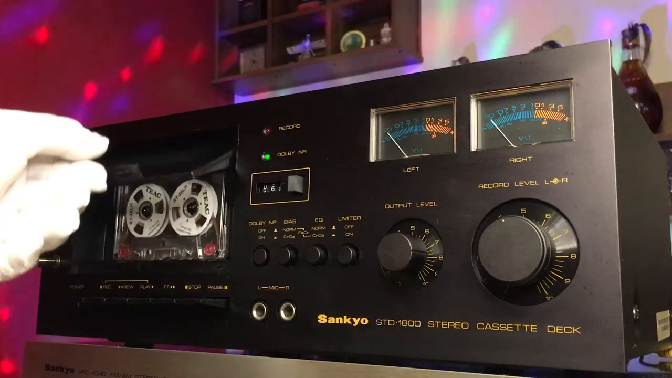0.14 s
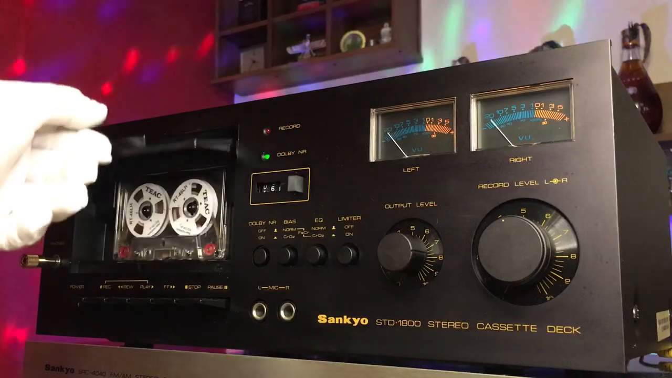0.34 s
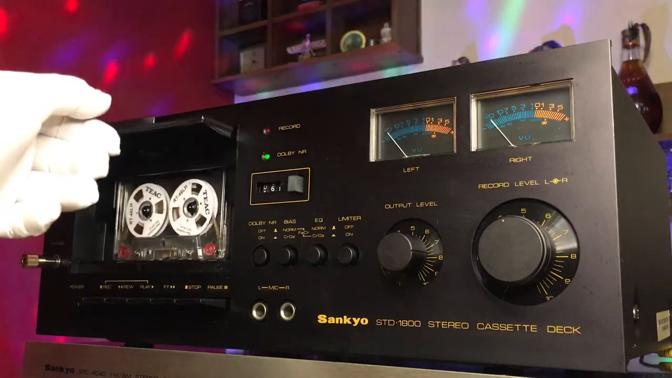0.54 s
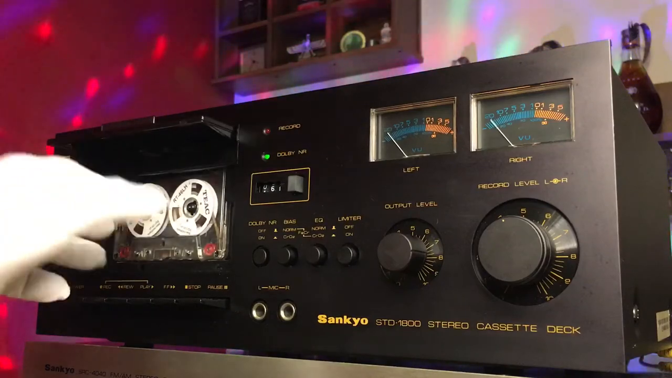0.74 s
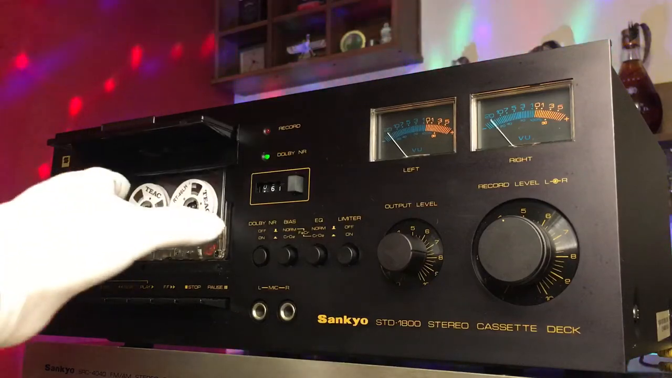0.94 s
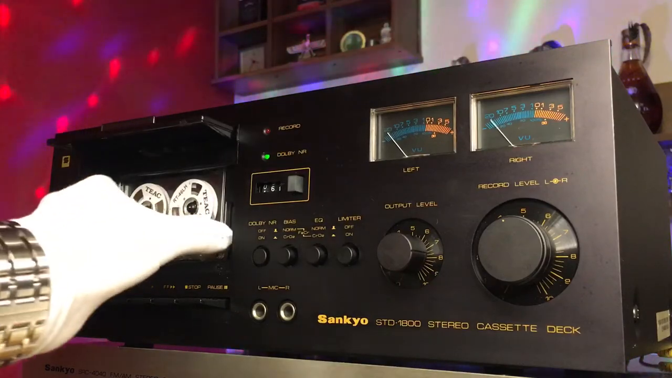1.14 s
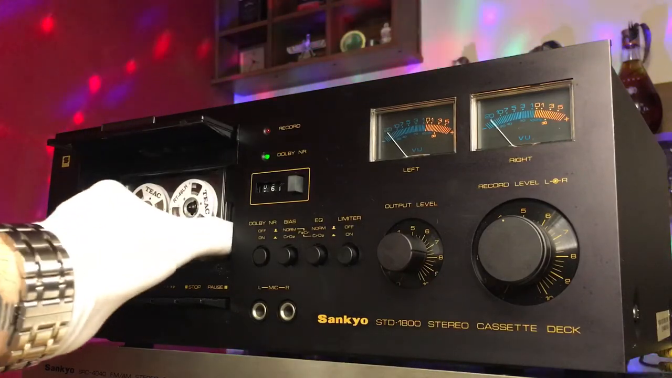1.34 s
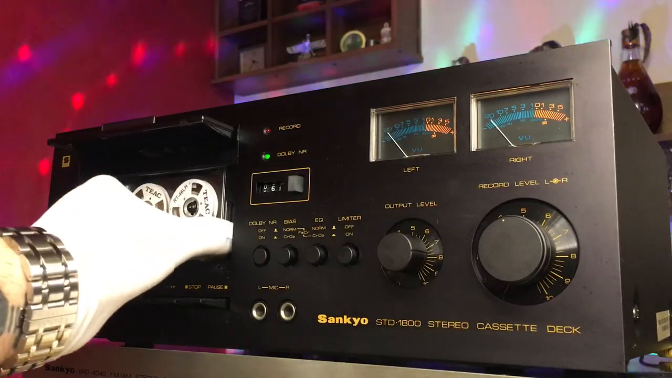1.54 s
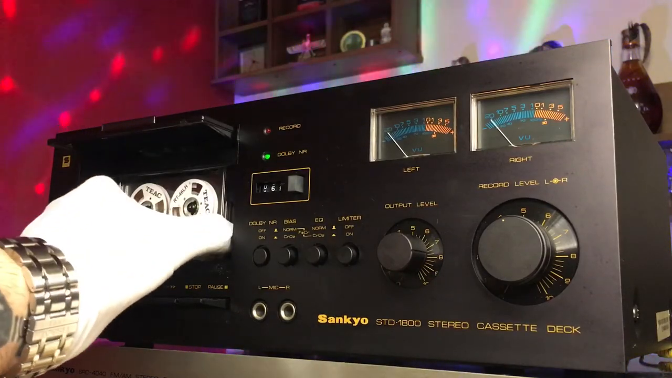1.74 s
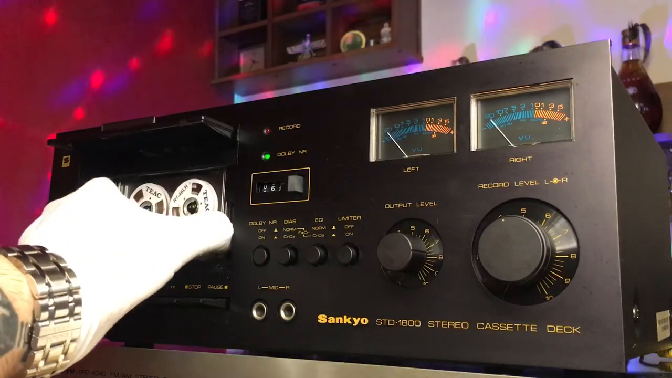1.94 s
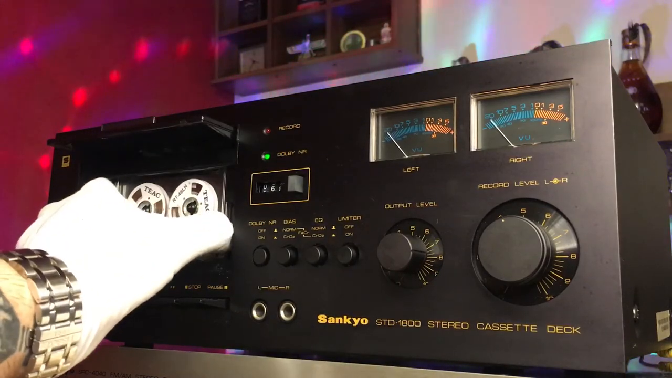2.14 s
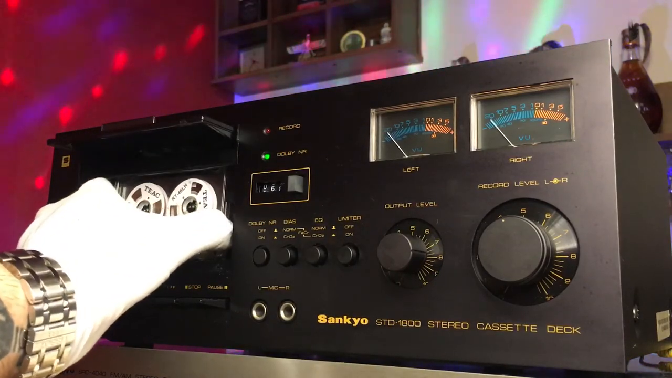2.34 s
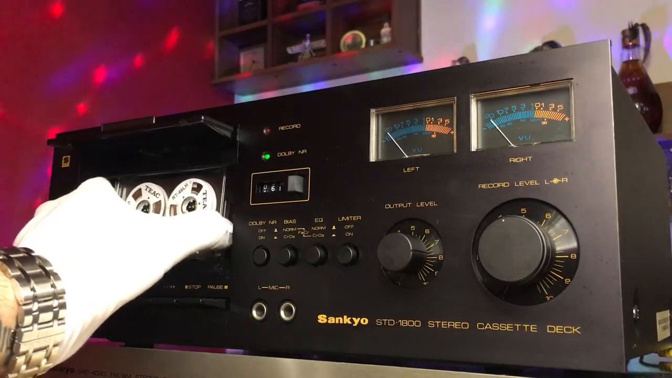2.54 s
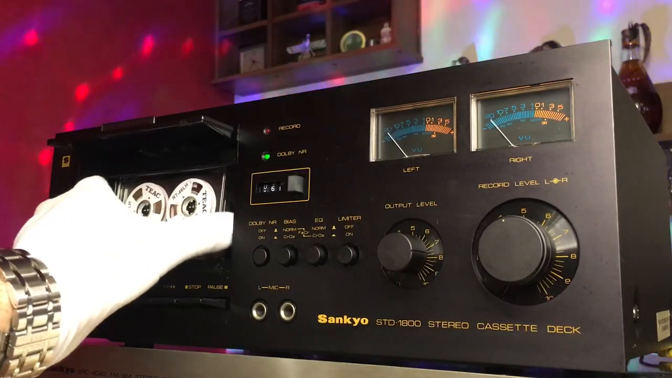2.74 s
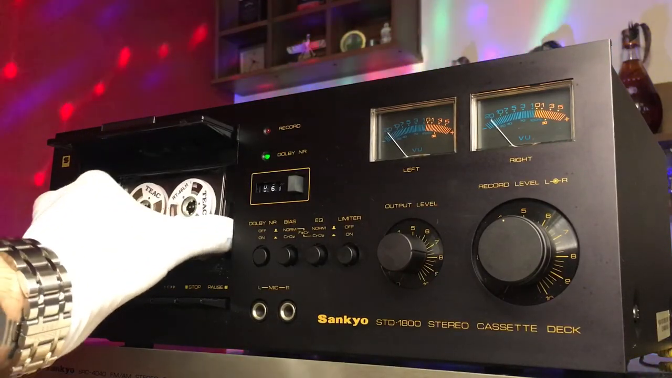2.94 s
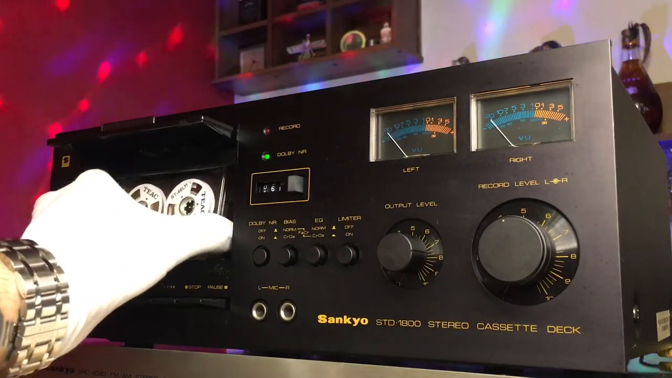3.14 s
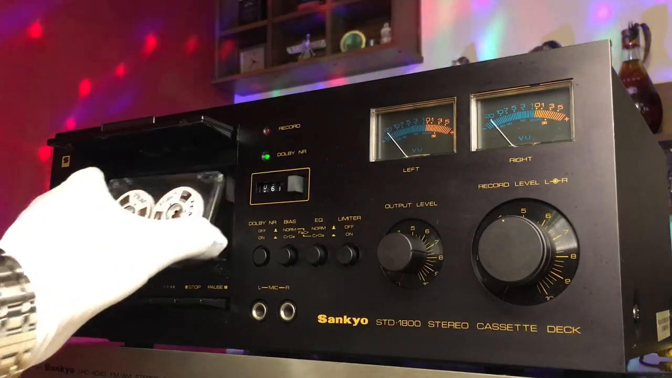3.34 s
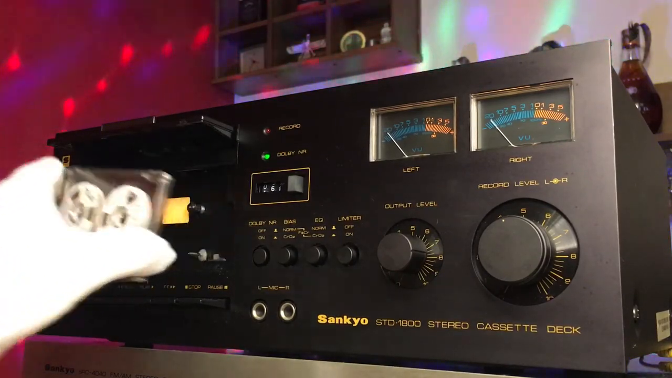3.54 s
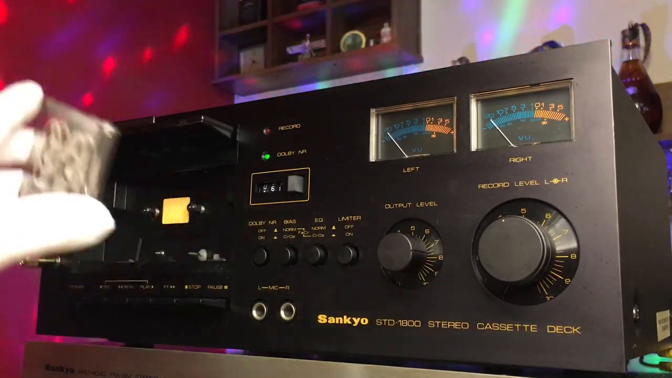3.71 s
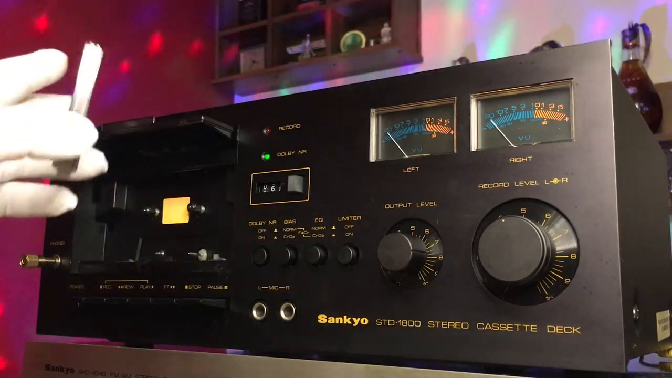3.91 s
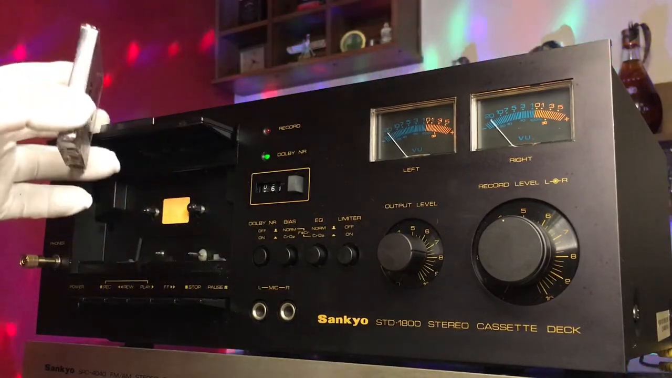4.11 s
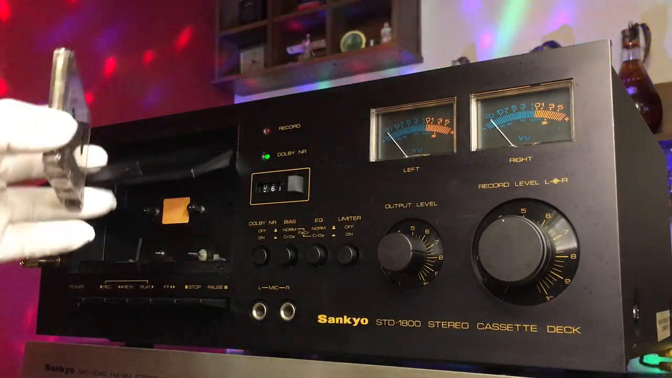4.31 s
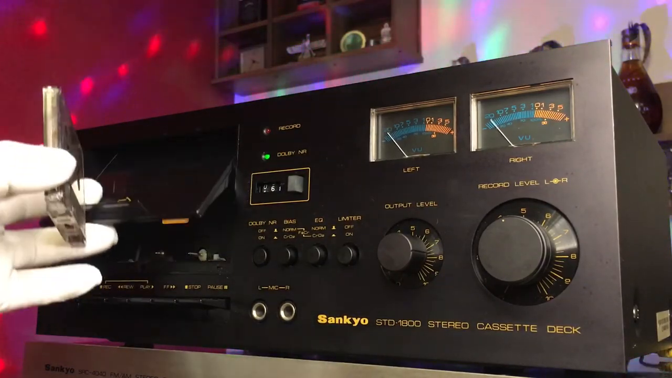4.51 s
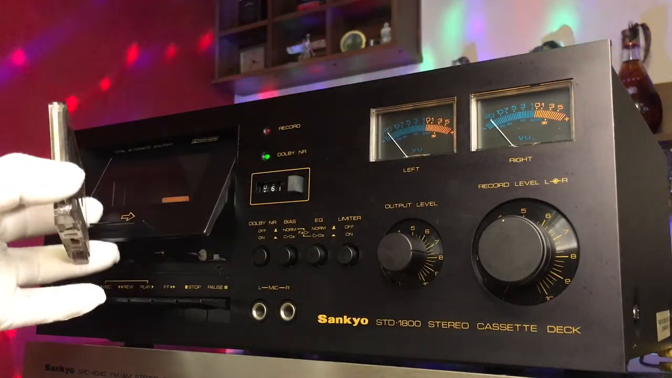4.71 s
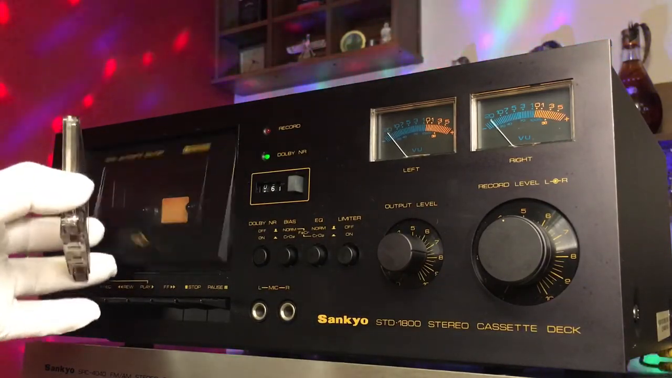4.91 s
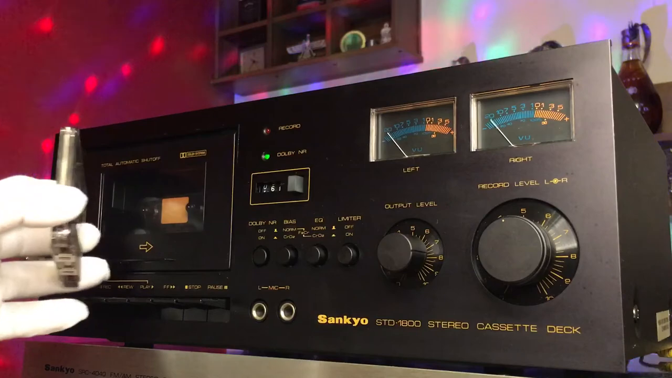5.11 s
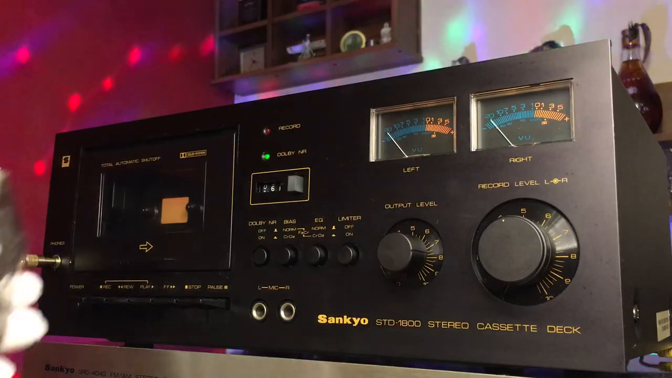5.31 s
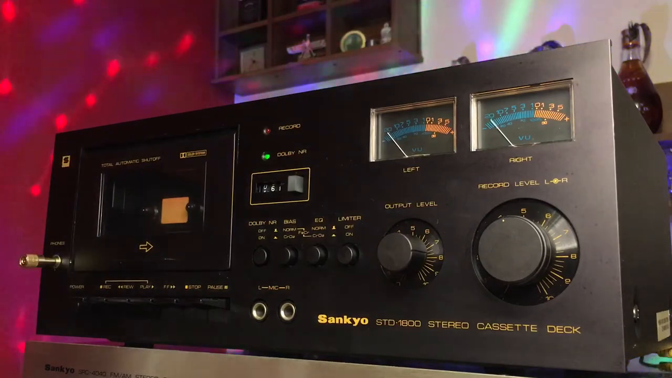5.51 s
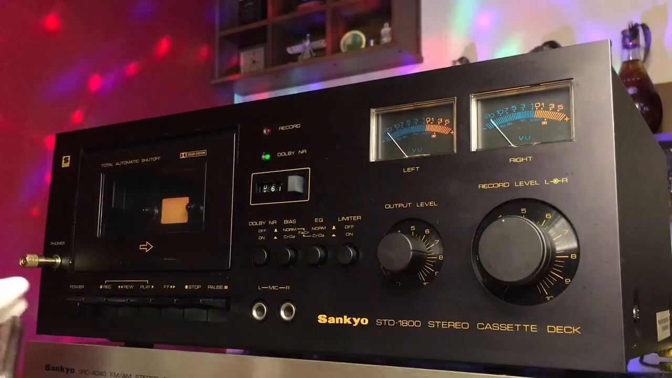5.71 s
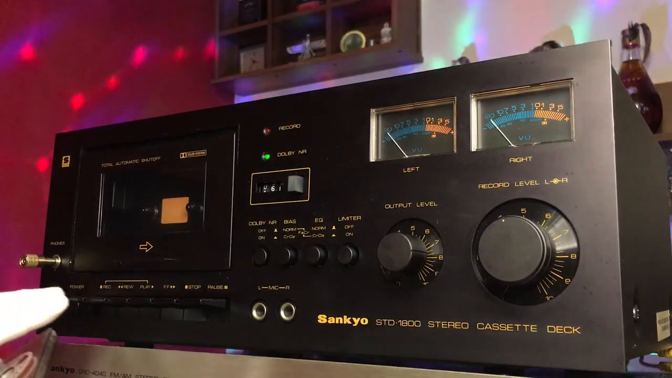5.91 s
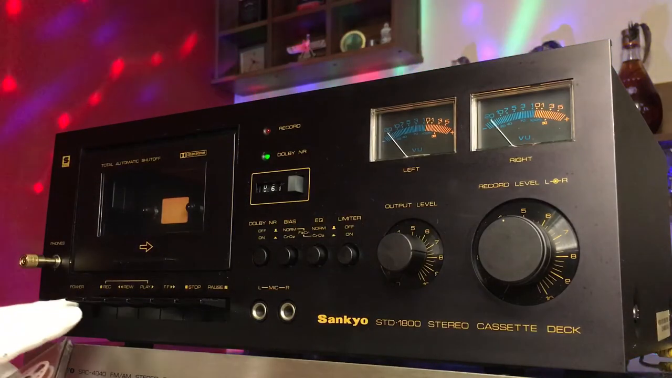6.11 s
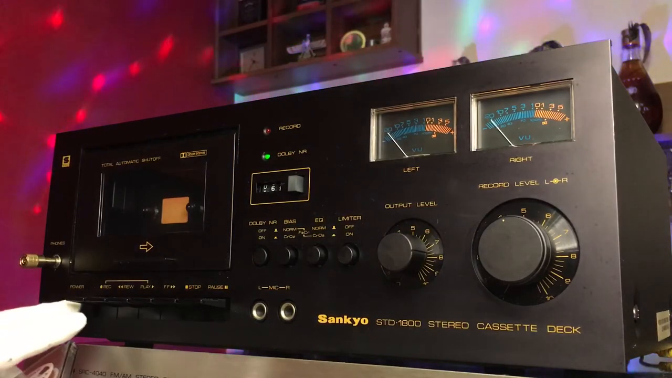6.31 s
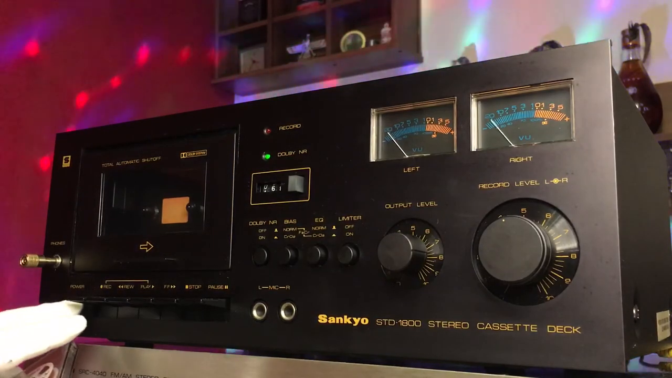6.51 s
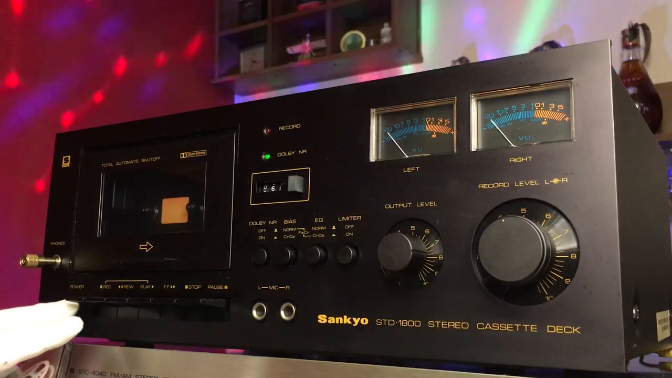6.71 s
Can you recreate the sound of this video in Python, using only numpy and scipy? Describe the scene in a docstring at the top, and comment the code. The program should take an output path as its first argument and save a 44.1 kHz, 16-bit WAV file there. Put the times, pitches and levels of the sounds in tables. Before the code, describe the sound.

Close view of a cassette deck in a small quiet room. The door flips up with a sharp bouncing clack, gloved fingers rub and tick faintly on plastic, the cassette comes free in a quick rattle, then the door slams shut with a louder, hollow snap. Faint clicks at a key follow, over low hum and soft room tone.

```python
"""Cassette deck door, handled in a small quiet room

A hand works the door of a cassette deck: the door flips up against its stop, fingers rock the cassette and
pull it off its spindles, the door snaps shut and bounces, a finger then presses a key. Noise bursts ring the
struck part, front panel and hollow case; sliding is grainy noise. Sine hum, room tone, far rumble below."""
import sys
import numpy as np
from scipy import signal
from scipy.fft import rfft, irfft
from scipy.io import wavfile

SR = 44100
rng = np.random.default_rng(int(sys.argv[2]) if len(sys.argv) > 2 else 0)


def output_pcm(signal):
    """Save a mono or channel-first signal as 16-bit PCM at the path in sys.argv[1].

    Samples are clipped to [-1, 1] before scaling.
    """
    pcm = np.clip(np.atleast_2d(signal).T, -1, 1) * 32767
    wavfile.write(sys.argv[1], SR, np.round(pcm).astype(np.int16))


N = 302526

# door meets a stop: t/s, level/dB, door f/Hz, contact length/ms, door ring t60/ms, edge crack/dB,
# broad knock/dB, push on case/dB, stop f/Hz, stop level/dB, time to first bounce/s
DOOR_BLOWS = [(0.449, -15.5, 1016, 5.15, 23, -6.5, -2, -12.5, 2804, -12.5, .0339),
              (5.0128, -8, 1372, 3.64, 19, -16, -1.4, -12, 855, -9.5, .0382)]
# bounces after each blow: delay/first-bounce times, level change/dB, push change/dB
BOUNCES = [(1.0, -9, -8.5), (1.25, -16.5, -4)]
# fingers, cassette, key: t/s, level/dB, part f/Hz, part ring t60/ms, edge crack/dB, broad knock/dB,
# push on case/dB
TOUCHES = [ (1.008, -49.5, 1110, 9.8, -28, -7, -21), (1.618, -47.5, 940, 73, -7, 6.5, -3.5),
           (1.958, -54.5, 1020, 18, -14, -2, -11), (2.086, -48, 1370, 9.4, -27, 6, -11),
           (2.242, -54.5, 1930, 8.4, 0, 5, -3), (2.253, -52.5, 2930, 9, -9, -1, -18),
           (2.262, -48, 1350, 17, -19, 4, -27), (2.312, -57, 3300, 10, -1, -4, -4),
           (2.487, -50.5, 1320, 9.1, -9, -10.5, -7), (2.612, -57, 1970, 8.1, 3.5, 0, -2),
           (2.734, -53, 2000, 12, -23, 7.5, -16), (2.771, -55, 1330, 15, -3, -2, -2),
           (2.791, -45, 587, 40, -22, -20, -18), (3.155, -37.5, 920, 10, -24, -5, -8),
           (3.167, -42.5, 2930, 7.6, -4, 4, -11), (3.173, -42, 1150, 14, -18, -11, -6),
           (3.192, -36.5, 1400, 15, -2.5, 0, -25), (3.205, -39, 1680, 17, -15, -4, -13),
           (3.232, -37.5, 3140, 9.8, -11, -6, -19), (3.239, -35, 3890, 14, -4, 3, -8),
           (3.246, -35, 1350, 14, 0.8, 7.5, -13.5), (3.249, -25.5, 1340, 22, -7.5, 4, -13.5),
           (3.292, -38, 1070, 37, -25, -5, -8), (3.303, -35.5, 1225, 37, -22, -3.5, -8.5),
           (3.342, -38.5, 1360, 12, -20, -1, -24), (3.363, -40, 1110, 11, -31, -17, -3),
           (3.817, -47.5, 5300, 7, 3, -5, -13.5), (4.043, -46, 985, 11, -32, -4.5, -10),
           (4.258, -38.5, 923, 32, -23, -3, -11.5), (4.319, -54, 970, 29, -25, -9, -19),
           (4.946, -51.5, 905, 38, -20, -3, -4), (6.207, -48, 1830, 7.3, -8, -12, -16),
           (6.505, -44, 1800, 33, -1.5, 2.7, -21), (6.761, -43, 1743, 30, -11, -18, -22.5),
           (6.767, -43, 1710, 39, -24, -6, -17), (6.786, -57, 650, 12, 5, 7, 7.5)]
# plastic on plastic, modes too many to count: f/Hz, spectral density/dB
KNOCK_SPECTRUM = [(150, -27), (400, -19), (700, -14), (1000, -11), (1500, 6), (2100, -5.5), (3300, -9.5),
                  (6000, -23.5), (10000, -37), (15500, -49.5)]
# front panel and door modes: f/Hz, level/dB, t60/s
PANEL_MODES = [(703, -15, 0.15), (832.4, -5, .1), (877, -7.5, 0.029), (1080, -16.5, 0.096),
               (1201, -1.5, 0.063), (1227, 0, 0.071), (1403, 0, .08), (1664, -9, 0.094), (1800, -7, 0.06),
               (1998, 2.5, .08), (2705, -11.5, 0.066)]
# hollow case modes: f/Hz, level/dB, t60/s
CASE_MODES = [(133, -9, 0.39), (159.4, -7.5, 0.616), (187.7, -4.5, .33), (212.3, -2.5, 0.28),
              (250.2, 0, 0.18), (285.1, 2, 0.26), (320, -7, .2), (396, -7, 0.37), (501.4, -3.5, 0.2176),
              (561.5, -10.5, .2), (602.5, -2.5, 0.257), (630, -12, 0.199)]
# glove and cassette sliding on plastic: loudest t/s, swell/s, fade/s, level/dB, tilt/(dB per octave)
STROKES = [(0.83, 0.058, 0.13, -69.5, -8.5), (1.1, 0.052, .06, -66.5, -4), (1.375, 0.13, 0.12, -60, -0.5),
           (1.466, 0.016, 0.082, -60.5, -3), (1.62, 0.018, 0.064, -57.5, -11.5),
           (2.8, 0.027, .13, -61.5, 5), (2.796, 0.011, 0.14, -72.5, -20.5), (2.956, .02, 0.024, -58.5, -2),
           (3.075, 0.035, .1, -62.5, 5.5), (3.16, 0.08, 0.18, -59, -3), (3.37, 0.082, 0.066, -62, -13),
           (6.212, 0.027, .14, -53.5, 3), (6.305, .03, 0.09, -66.5, -3.5)]
# case creaking under the hand: t/s, level/dB
CREAK_LEVEL = [(1.55, -84), (1.62, -64), (1.75, -76), (2.1, -68), (2.3, -64), (2.7, -69), (2.8, -63),
               (2.95, -64), (3.12, -65.5), (3.33, -72), (3.4, -53.5), (3.5, -75), (3.9, -75), (4.02, -65),
               (4.2, -73.5), (4.5, -71)]
# knocks reaching the microphone through its support: t/s, level/dB, f/Hz, t60/s
SUPPORT_KNOCKS = [(6.7872, -29, 345, 0.0062), (6.792, -44, 193, .06), (6.826, -43.5, 64, 0.38),
                  (6.825, -40.5, 130, 0.15)]
# room decay: f/Hz, t60/s
ROOM_DECAY = [(150, 0.61), (400, 0.46), (1000, 0.4), (2500, 0.37), (6000, .27), (12000, 0.2)]
# transformer and small motor: f/Hz, rms level/dB
HUM_LINES = [(100, -65), (200, -82.5), (304, -79.5), (609, -81.5), (903, -81.5), (2439, -92), (3048, -85.5)]
# room tone and microphone hiss: f/Hz, relative spectral density/dB
AIR_SPECTRUM = [(12, -55.5), (20, -31), (43, -6), (101, -6.5), (127, -13.5), (193, -8.5), (270, -20.5),
                (293, -18.5), (590, -20), (738, -23.5), (923, -22.5), (1400, -26.5), (3160, -28.5),
                (8410, -34.5), (16000, -45.5)]
# far rumble: t/s, level/dB
RUMBLE_LEVEL = [(0.0, -75), (0.53, -62.5), (2.46, -76), (2.77, -62), (3.57, -77), (4.22, -63.5),
                (6.86, -71.5)]

DOOR_CRACK_HZ, TOUCH_CRACK_HZ = 4630, 3400
TOUCH_MS, BOUNCE_MS = 2.5, 3.3
BOUNCE_RING_MS, STOP_RING_MS = 14, 30
BOUNCE_CRACK_DB = -4  # relative to the crack of the blow
PART_DB, CRACK_DB, SNAP_DB, PANEL_DB, CASE_DB = -0.5, 1.5, -6.5, -20, -3.5
STROKE_RANGE_DB = 20  # swell and fade of a slide
ROOM_DB = -11.5
PARTS_TO_ROOM_DB = -0.5  # small parts face the microphone, send less to the walls
AIR_DB, RUMBLE_WANDER_DB = -62.5, 2.5
STOPBAND_HZ = 16250


def door_blows():
    """Door and stop both ring; two weaker bounces follow each blow."""
    rows = []
    for (s, level_db, door_hz, length_ms, ring_ms, crack_db, knock_db, push_db,
         stop_hz, stop_db, bounce_s) in DOOR_BLOWS:
        hits = [(s, level_db, crack_db, push_db, length_ms, ring_ms)]
        for delay, change_db, push_change_db in BOUNCES:
            hits.append((s + delay * bounce_s, level_db + change_db, crack_db + BOUNCE_CRACK_DB,
                         push_db + push_change_db, BOUNCE_MS, BOUNCE_RING_MS))
        for hit_s, hit_db, hit_crack_db, hit_push_db, hit_ms, hit_ring_ms in hits:
            rows.append((hit_s, hit_db, door_hz, DOOR_CRACK_HZ, hit_crack_db,
                         knock_db, hit_push_db, hit_ms, hit_ring_ms))
            rows.append((hit_s, hit_db + stop_db, stop_hz, DOOR_CRACK_HZ, hit_crack_db,
                         knock_db, hit_push_db, hit_ms, STOP_RING_MS))
    return rows


def touches():
    """Small contacts are equally brief and crack in one band."""
    return [(s, level_db, part_hz, TOUCH_CRACK_HZ, crack_db, knock_db, push_db, TOUCH_MS, ring_ms)
            for s, level_db, part_hz, ring_ms, crack_db, knock_db, push_db in TOUCHES]


def contacts():
    """A few ms of chatter: hard edges crack first, the part rings next, panel and case follow."""
    parts, direct, panel_force, case_force = np.zeros((4, N))
    ms = np.arange(4096) * 1000 / SR
    grid_hz = np.linspace(1, SR / 2, 257)
    # minimum_phase halves the dB, hence the factor 2
    knock_fir = signal.firwin2(511, np.linspace(0, 1, 257), amp(2 * at_hz(KNOCK_SPECTRUM, grid_hz)))
    taps = signal.minimum_phase(knock_fir)
    push = np.sin(np.pi * np.clip(ms / 1.78, 0, 1))  # one soft shove
    push /= push.sum()
    for (s, level_db, part_hz, crack_hz, crack_db, knock_db, push_db,
         length_ms, ring_ms) in door_blows() + touches():
        length_ms = max(length_ms, .3)
        white = rng.standard_normal((2, 4096))
        sharp = white[0] * np.minimum(ms / 0.17, 1) * np.exp(-ms / length_ms)
        # heavier parts take a moment to move
        swelling = white[1] * ms * np.exp(-ms / (0.73 * length_ms))
        crack = peak_one(band(sharp, crack_hz / 2.1, crack_hz * 1.77))
        part = peak_one(ring(swelling, part_hz, max(ring_ms, 4) / 1000))
        knock = peak_one(signal.lfilter(taps, 1, swelling))
        # first instant reaches the top octave, more so in hard blows
        snap = peak_one(band(sharp * np.exp(-ms / 2.2), 4800, 13000))
        edge = crack + amp(SNAP_DB + 0.82 * level_db) * snap
        add(parts, s, amp(level_db + PART_DB) * part)
        add(direct, s, amp(level_db) * (amp(CRACK_DB + crack_db) * edge + amp(knock_db) * knock))
        add(panel_force, s, amp(level_db + knock_db) * rms_one(swelling) / 64)  # unit-energy burst
        add(case_force, s, amp(level_db + push_db) * push)
    panel = ring_modes(panel_force, PANEL_MODES)
    case = band(ring_modes(case_force, CASE_MODES), 125, 2000)
    return parts, direct + amp(PANEL_DB) * panel + amp(CASE_DB) * case


def slides():
    """Dense uneven friction grains, tilted dark or bright per stroke; noise-driven case modes creak."""
    t, out = np.arange(N) / SR, np.zeros(N)
    unevenness_db = 3.4 * np.minimum(rng.exponential(1, N), 4)
    grains = rng.standard_normal((2, N)) * amp(unevenness_db) * amp(2.5 * drift(43))
    centres_hz = np.geomspace(424, 9600, 10)
    bands = [rms_one(band(grains[k % 2], hz / 1.22, hz * 1.22)) for k, hz in enumerate(centres_hz)]
    for s, swell_s, fade_s, level_db, tilt_db in STROKES:
        i = slice(round((s - swell_s) * SR), round((s + fade_s) * SR))
        stroke_db = level_db - STROKE_RANGE_DB * np.maximum((s - t[i]) / swell_s, (t[i] - s) / fade_s)
        rub = 0
        for b, hz in zip(bands, centres_hz):
            octaves = np.log2(hz / 2000)
            rub = rub + b[i] * amp(tilt_db * octaves - 4.2 * octaves ** 2)
        out[i] += amp(stroke_db) * rub / 2
    creak = rms_one(sum(amp(db) * ring(rng.standard_normal(N), hz, 0.068)
                        for hz, db, _ in CASE_MODES[1:8]))
    creak_db = np.interp(t, *np.transpose(CREAK_LEVEL), left=-120, right=-120)
    return out + amp(creak_db) * creak


def bumps():
    """Dull knocks through the support: one decaying sine each."""
    out = np.zeros(N)
    for s, level_db, hz, t60_s in SUPPORT_KNOCKS:
        add(out, s, -amp(level_db) * ring(signal.unit_impulse(8192), hz, t60_s))
    return out


def room(x):
    """Diffuse echoes: noise that builds in a few ms and dies band by band."""
    t, edges_hz = np.arange(SR // 2) / SR, 90 * 2 ** np.arange(0, 8, .5)
    white = rng.standard_normal((2, SR // 2))
    echo = np.zeros(SR // 2)
    for k, (low_hz, high_hz) in enumerate(zip(edges_hz, edges_hz[1:])):
        t60_s = at_hz(ROOM_DECAY, np.sqrt(low_hz * high_hz))
        echo += band(white[k % 2], low_hz, high_hz) * amp(-60 * t / t60_s)
    echo *= np.clip((t - .003) / 0.0032, 0, 1)
    return signal.fftconvolve(x, echo / np.sqrt(np.sum(echo ** 2)))[:N]


def background():
    """Slightly wavering hum lines, noise shaped to smooth room tone, lumpy low-band rumble."""
    t = np.arange(N) / SR
    hum = sum(amp(db + 0.83 * drift(1.8)) * np.sqrt(2) * np.sin(2 * np.pi * (hz * t + rng.random()))
              for hz, db in HUM_LINES)
    bins_hz = np.maximum(np.arange(N // 2 + 1) * SR / N, 1)
    air = rms_one(irfft(rfft(rng.standard_normal(N)) * amp(at_hz(AIR_SPECTRUM, bins_hz)), N))
    rumble = rms_one(band(rng.standard_normal(N + SR), 33, 80)[SR:])
    rumble_db = np.interp(t, *np.transpose(RUMBLE_LEVEL)) + RUMBLE_WANDER_DB * drift(1.5)
    return hum + amp(AIR_DB) * air + amp(rumble_db) * rumble


def amp(db):
    """Decibels to gain."""
    return 10 ** (np.asarray(db) / 20)


def rms_one(x):
    """Scale to rms 1."""
    return x / np.sqrt(np.mean(x ** 2) + 1e-20)


def peak_one(x):
    """Scale to peak 1."""
    return x / np.abs(x).max()


def at_hz(points, hz):
    """Interpolate a table on a log-frequency axis."""
    f_hz, values = np.array(points).T
    return np.interp(np.log(hz), np.log(f_hz), values)


def drift(rate_hz):
    """Slow chance: noise through a double one-pole low-pass; rms 1."""
    r = np.exp(-80 * np.pi * rate_hz / SR)  # runs at SR / 40
    slow = signal.lfilter([1], [1, -2 * r, r * r], rng.standard_normal(N // 40 + 2002))[2000:]
    return np.interp(np.arange(N) / 40, np.arange(len(slow)), rms_one(slow))


def ring(force, hz, t60_s):
    """Two-pole resonator: a unit click starts a decaying sine of height 1."""
    r, w = amp(-60 / (t60_s * SR)), 2 * np.pi * hz / SR
    return signal.lfilter([0, np.sin(w)], [1, -2 * r * np.cos(w), r * r], force + 1e-18)


def ring_modes(force, modes):
    """Sum of resonators driven by one force, signs alternating."""
    return sum((-1) ** k * amp(db) * ring(force, hz, t60_s) for k, (hz, db, t60_s) in enumerate(modes))


def band(x, low_hz, high_hz):
    """Butterworth band-pass."""
    edges_hz = [low_hz, min(high_hz, .45 * SR)]
    return signal.sosfilt(signal.butter(2, edges_hz, "band", fs=SR, output="sos"), x)


def add(track, s, x):
    """Mix x into track from time s on."""
    i = round(s * SR)
    track[i:i + len(x)] += x[:N - i]


def scene():
    """Deck and hand, their echoes, support knocks, background."""
    parts, body = contacts()
    deck = body + slides()
    echoes = room(deck + amp(PARTS_TO_ROOM_DB) * parts)
    return (parts + deck + amp(ROOM_DB) * echoes + bumps() + background())[None]


def record(dry):
    """The small microphone loses the deepest bass; the top is cut steeply."""
    dry = signal.sosfilt(signal.butter(2, 30.0, "high", fs=SR, output="sos"), dry)
    return signal.sosfilt(signal.cheby2(16, 70, STOPBAND_HZ, fs=SR, output="sos"), dry)


dry = scene()
out = record(dry)
output_pcm(out)
```